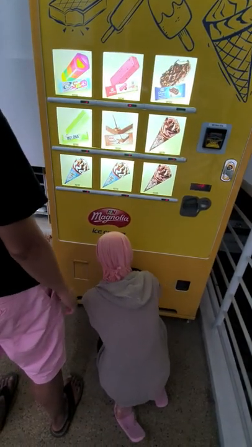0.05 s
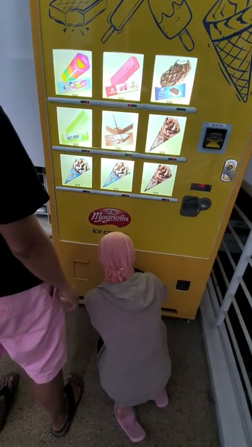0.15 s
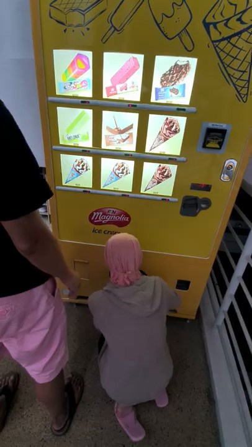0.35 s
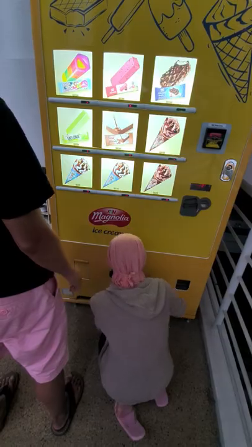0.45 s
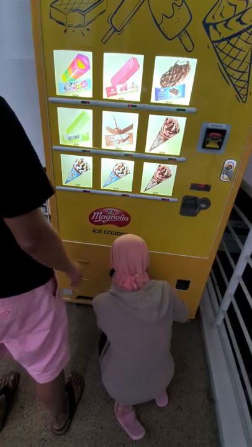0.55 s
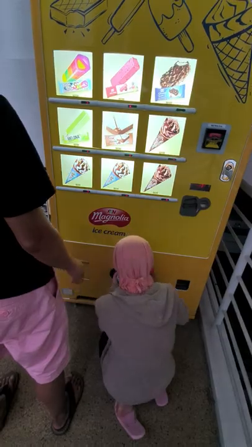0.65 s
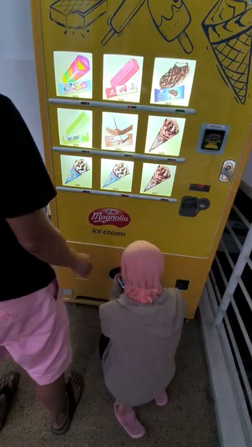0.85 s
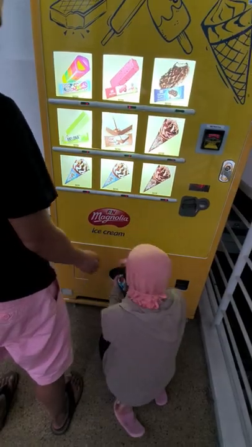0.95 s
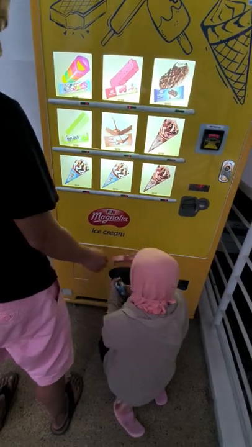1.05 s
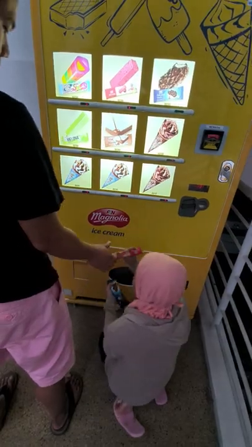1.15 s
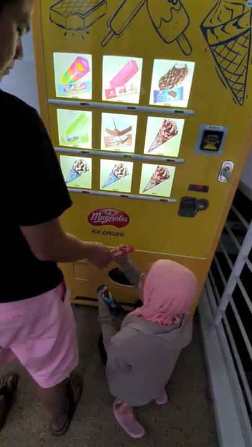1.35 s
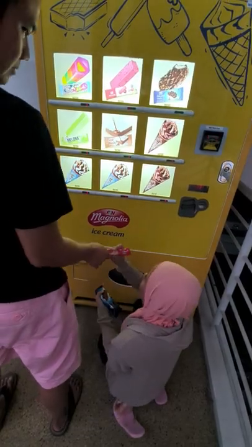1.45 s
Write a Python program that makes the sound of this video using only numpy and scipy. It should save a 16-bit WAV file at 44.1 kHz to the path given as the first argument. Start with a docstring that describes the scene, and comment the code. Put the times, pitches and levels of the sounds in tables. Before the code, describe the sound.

A vending machine's pickup flap clacks with a deep thud as a motor hum fades out. The cabinet bumps softly, then faint wrapper and cloth rustling follows. Low refrigeration drone continues throughout, heard nearby in a slightly echoing passage.

```python
"""A heavy thud and a plastic clack at the pickup flap of a vending machine, in a hard-walled passage.
Blows drive the low modes of the cabinet panels, while the flap clatters and a small metal part rings.
A motor hums at the start and fades out around the thud. Soft bumps follow in the cabinet, then
a faint scrape, and wrapper and clothes rustle and snap. The refrigeration drones underneath throughout."""
import sys
import numpy as np
from scipy import signal
from scipy.fft import rfft, irfft, next_fast_len
from scipy.io import wavfile
from scipy.ndimage import uniform_filter1d, map_coordinates

SR = 44100
rng = np.random.default_rng(int(sys.argv[2]) if len(sys.argv) > 2 else 0)


def master(y):
    """Save y as 16-bit WAV."""
    cut = np.clip(np.atleast_2d(y).T, -1, 1)
    pcm = np.round(cut * 32767)  # scale
    wavfile.write(sys.argv[1], SR, pcm.astype(np.int16))


N = 66150
T = np.arange(N) / SR
MAIN_BLOW_S = 0.234
KNOCK_ATTACK_S, CLACK_ATTACK_S = 0.0015, 0.00082


def amp(db):
    """Decibels to amplitude ratio."""
    return 10 ** (np.asarray(db) / 20)


def unit(x):
    """Normalisation to rms 1."""
    return x / np.sqrt(np.mean(x ** 2) + 1e-20)


def along(points, hz):
    """Interpolation of (frequency_hz, value) points on a logarithmic frequency axis."""
    frequencies, values = np.transpose(points)
    return np.interp(np.log(hz + 1), np.log(frequencies + 1), values)


def level(points):
    """Amplitude envelope through (time_s, level_db) points."""
    return amp(np.interp(T, *np.transpose(points)))


def wobble(knots_per_s):
    """Smooth random modulation: a spline through Gaussian values."""
    return map_coordinates(rng.standard_normal(400), [T * knots_per_s], mode="wrap")


def strike(start_s, attack_s, t60_s):
    """Envelope of a damped vibration: a quick rise, then exponential decay."""
    age = np.maximum(T - start_s, 0)
    return (1 - np.exp(-age / attack_s)) * amp(-60 * age / t60_s)


def filtered(x, response):
    """Linear filtering: the spectrum is multiplied by a frequency response."""
    size = next_fast_len(N + SR // 2)
    return irfft(rfft(x, size) * response(np.fft.rfftfreq(size, 1 / SR)), size)[..., :N]


def spread(pair, colour, tilt=0):
    """Coherence falls with frequency: two independent signals become stereo, mono in the bass."""
    # left-right likeness: frequency_hz, correlation
    coherence = [(30, 1), (130, 0.98), (280, 0.94), (550, 0.33), (1100, -0.059), (12000, -0.11)]

    def response(hz):
        angle = np.arccos(np.clip(along(coherence, hz), -1, 1)) / 2
        gain = amp(along(colour, hz) + tilt * np.log2(1 + hz / 1000))
        return gain * [np.cos(angle), np.sin(angle)]
    mid, side = filtered(pair, response)
    return unit(np.array([mid + side, mid - side]))


def noise(colour, tilt=0):
    """Spectrally shaped stereo noise of rms 1; tilt is in dB per octave well above 1 kHz."""
    return spread(rng.standard_normal((2, N)), colour, tilt)


def patchy(x, depth_db):
    """Spectral modulation: random gain in patches of time and frequency makes the colour shift."""
    spectra = signal.stft(x, nperseg=256)[2]
    field = uniform_filter1d(rng.standard_normal(spectra.shape[1:]), size=8, axis=0)
    field = uniform_filter1d(field, size=9, axis=1)
    return unit(signal.istft(spectra * amp(depth_db * unit(field)), nperseg=256)[1][:, :N])


def passage(x):
    """Reverberation between hard walls: convolution with a tail whose decay depends on frequency."""
    # reverberation time: frequency_hz, t60_s
    decay = [(80, 0.92), (250, 0.91), (1000, 0.11), (3000, 0.32), (12000, 0.17)]
    hz, t, spectra = signal.stft(noise([(20, 0), (20000, 0)]), SR, nperseg=256)
    tail = signal.istft(spectra * amp(-60 * t / along(decay, hz)[:, None]), SR, nperseg=256)[1]
    return signal.fftconvolve(np.atleast_2d(x), tail / np.linalg.norm(tail[0]), axes=1)[:, :N]


def tones(lines, drift_rad, flutter_db):
    """A machine's line spectrum, with slight random amplitude and phase modulation."""
    out = 0
    for hz, db in lines:
        peak = np.sqrt(2) * amp(db + flutter_db * wobble(11.01))
        out += peak * np.sin(2 * np.pi * (hz * T + rng.random()) + drift_rad * wobble(14.05))
    return out


def machinery():
    """Broadband fan noise under the line spectra of the refrigeration and of a motor that fades out."""
    # fan spectrum: frequency_hz, gain_db
    fan_colour = [(20, -21), (40, -3), (60, 0.5), (100, -1.5), (160, -5.5), (260, -8), (400, -8.5),
                  (560, -13.5), (700, -17), (1200, -21), (2700, -23), (5500, -32.5), (7200, -33),
                  (8000, -41), (12000, -42.5), (15500, -59)]
    # fan envelope: time_s, level_db
    fan_level = [(0, -35), (.2, -35), (.35, -38.5), (.55, -38), (.7, -40), (1.0, -40.5), (1.3, -41),
                 (1.5, -39)]
    # refrigeration tones: pitch_hz, level_db
    hum_lines = [(90, -54), (122, -50.5), (194, -55.5), (243, -55.5), (362, -53), (489, -57), (786, -65.5),
                 (1211, -68)]
    # motor tones: pitch_hz, level_db
    motor_lines = [(156, -35), (345, -45.5), (485, -51)]
    stop_s, release_s = 0.17, 0.17
    running = np.clip(1 - (T - stop_s) / release_s, 0, 1)
    fan = level(fan_level) * noise(fan_colour)
    hum = tones(hum_lines, drift_rad=0.47, flutter_db=2.5)
    return fan + hum + running * tones(motor_lines, drift_rad=0.56, flutter_db=1.5)


def scrape():
    """Sliding friction: a faint narrow band of noise swells and fades."""
    # hiss spectrum: frequency_hz, gain_db
    colour = [(5200, -22), (7050, 2), (8000, -34)]
    peak_s, width_s = 0.99, 0.05
    return amp(-59) * np.exp(-((T - peak_s) / width_s) ** 2) * noise(colour)


def rustle():
    """Friction of cloth and wrapper: a shifting hiss, with tiny crinkles as a Poisson process."""
    # envelope of the hand's rustling: time_s, level_db
    motion = [(0, -52), (.2, -54), (.36, -50.5), (.45, -62), (1.02, -59.5), (1.058, -52.5), (1.09, -45.5),
              (1.118, -53.5), (1.15, -48.5), (1.205, -45), (1.24, -51.5), (1.275, -48.5), (1.34, -47.5),
              (1.385, -54.5), (1.43, -47.5), (1.5, -51)]
    # rustle spectrum: frequency_hz, gain_db
    colour = [(300, 1), (1200, -2), (2200, 0.5), (4300, 0.5), (7000, -2.5), (8200, -7.5), (10000, -5.5),
              (13000, -9.5), (15500, -15.5)]
    crinkles_per_s, crinkle_decay_s = 1000, 0.00093
    onsets = rng.random(N) < crinkles_per_s / SR
    clicks = onsets * amp(3 * np.minimum(rng.exponential(size=N), 4))
    envelope = signal.lfilter([1], [1, -np.exp(-1 / (crinkle_decay_s * SR))], clicks)
    crinkles = spread(envelope * rng.standard_normal((2, N)), colour)
    hiss = patchy(noise(colour), depth_db=1.1)
    return level(motion) * (hiss + amp(-3) * crinkles)


def snaps():
    """Short transients have broad spectra: handling gives sharp ticks that reverberate."""
    # snaps: start_s, level_db, tilt_db_per_octave
    events = [(0.124, -40, 5), (0.369, -39.5, 1.5), (0.525, -41, -1), (1.0886, -40.5, 9),
              (1.1596, -39.5, 5), (1.417, -39.5, 8), (1.431, -34.5, 3), (1.4644, -29.5, 4.5),
              (1.4693, -30.5, -3), (1.476, -36, -8)]
    # snap spectrum: frequency_hz, gain_db
    colour = [(300, -4), (1200, 1), (2100, 5.5), (4300, -1.5), (8200, -4), (9800, -3.5), (13000, -10),
              (15500, -15.5)]
    direct = sum(amp(db) * strike(start, attack_s=0.00063, t60_s=0.027) * noise(colour, tilt)
                 for start, db, tilt in events)
    return direct + amp(-7.5) * passage(direct)


def jingle():
    """A loose metal part, shaken by the thud, rings in high modes roughened by phase modulation."""
    # contacts: start_s, level_db
    contacts = [(0.2505, -40), (0.268, -41)]
    # modes of the part: pitch_hz, gain_db, t60_s
    modes = [(9350, -4, 0.11), (12400, -4, 0.17), (12850, -4, 0.14), (14920, -9, 0.12)]
    jitter_rad, out = 0.67, 0
    for start, db in contacts:
        for hz, mode_db, t60 in modes:
            phases = np.array([jitter_rad * wobble(140) + 2 * np.pi * rng.random() for _ in range(2)])
            envelope = amp(db + mode_db) * strike(start, CLACK_ATTACK_S, t60)
            out += envelope * np.sin(2 * np.pi * hz * T + phases)
    return out


def bumps():
    """Soft impacts excite mainly low frequencies: a few damped cycles with a dull knock on top."""
    # bumps in the cabinet: start_s, level_db, pitch_hz, knock_db
    impacts = [(0.37, -19.5, 63, -35), (0.463, -21, 84, -36), (0.5214, -14, 89, -30.5)]
    # knock spectrum: frequency_hz, gain_db
    colour = [(80, 1), (150, 9.5), (260, 5.5), (350, 4.5), (550, -34), (800, -22), (1250, -6.5),
              (3000, -28.5), (8000, -39)]
    out = np.zeros((2, N))
    for start, db, hz, knock_db in impacts:
        out += amp(db) * strike(start, attack_s=0.0079, t60_s=0.13) * np.sin(2 * np.pi * hz * (T - start))
        out += amp(knock_db) * strike(start, KNOCK_ATTACK_S, t60_s=0.21) * noise(colour)
    return out


def flap():
    """Hard impacts on plastic: dense modes merge into a noise burst, and a few ring on as tones."""
    # contacts: start_s, level_db, tilt_db_per_octave
    contacts = [(0.207, -43, -1), (0.219, -29.5, -2.5), (0.235, -23.5, -1.5), (0.249, -32.5, 6.5),
                (0.2579, -36.5, 0.5), (0.27, -36, -2)]
    # clack spectrum: frequency_hz, gain_db
    colour = [(150, -9.5), (400, 1), (570, -2), (700, -4.5), (1150, 0), (1600, -8.5), (2300, -0.5),
              (3100, -2), (3800, -7.5), (6600, -14.5), (8400, -19), (9700, -13), (12600, -19.5),
              (15500, -25)]
    # modes of the flap: pitch_hz, gain_db, t60_s
    modes = [(1100.5, -16, 0.28), (1147, -24, 0.34), (1303, -17, 0.28), (2200, -12.5, 0.18),
             (2293, -11.5, 0.2), (2516, -13.5, 0.19), (3055, -35, 0.24)]
    # the flap shakes on, duller, after the main blow
    direct = amp(-34) * strike(MAIN_BLOW_S, KNOCK_ATTACK_S, t60_s=0.32) * noise(colour, tilt=-2.5)
    for start, db, tilt in contacts:
        ring = 0
        for hz, mode_db, t60 in modes:
            envelope = amp(mode_db + tilt * np.log2(hz / 3000)) * strike(start, CLACK_ATTACK_S, t60)
            ring += envelope * np.sin(2 * np.pi * (hz * T + rng.random((2, 1))))
        burst = noise(colour, tilt) * strike(start, CLACK_ATTACK_S, t60_s=0.1)
        direct += amp(db) * (burst + amp(-2) * ring)
    return direct + amp(-8.5) * passage(direct)


def cabinet():
    """Modal superposition: quick blows set the big panels booming, and loose panels rattle on."""
    # blows: start_s, level_db, dullness_db_per_octave
    blows = [(.217, -8.5, 1), (0.234, -0.5, 0.1), (0.2479, -2.5, 8.5)]
    # panel modes: pitch_hz, gain_db, t60_s
    modes = [(70, -19, 0.12), (106.6, 3, 0.15), (128.5, 1.5, 0.053), (145.7, -5, 0.071), (191, -9, 0.056),
             (211.2, -22.5, 0.22), (307, -7, 0.036), (314.7, -27.5, 0.43), (393, -43, 0.87),
             (463, -29, 0.27), (505.5, -7.5, 0.029)]
    # rattle spectrum: frequency_hz, gain_db
    colour = [(40, -23), (65, -3), (110, 5), (220, 10), (330, 1), (500, -5), (620, -6), (750, -33),
              (2000, -40)]
    swell_cycles, boom = 0.9, 0
    for start, db, dullness in blows:
        for hz, mode_db, t60 in modes:
            gain = amp(db + mode_db - dullness * np.log2(hz / 100))
            boom += gain * strike(start, swell_cycles / hz, t60) * np.sin(2 * np.pi * hz * (T - start))
    rattle = amp(-27) * strike(MAIN_BLOW_S, KNOCK_ATTACK_S, t60_s=0.6) * noise(colour)
    return boom + rattle + amp(-17.5) * passage(boom)


def scene():
    """Superposition: the pressures of all sources add at the microphone."""
    return cabinet() + bumps() + flap() + jingle() + scrape() + rustle() + snaps() + machinery()


def record(dry):
    """Frequency response: each microphone port colours its channel, up to a band limit."""
    # left port minus right port: frequency_hz, difference_db
    ports = [(200, 0.5), (400, 0.5), (600, -4.5), (850, 4), (1250, 2), (2000, 0), (3200, 1.5), (5500, -0.1),
             (10300, -3), (12500, -5), (15500, 0)]
    top_hz = 15600
    return filtered(dry, lambda hz: amp(np.outer([.5, -.5], along(ports, hz))) * (hz < top_hz))


dry = scene()
out = record(dry)
master(out)
```